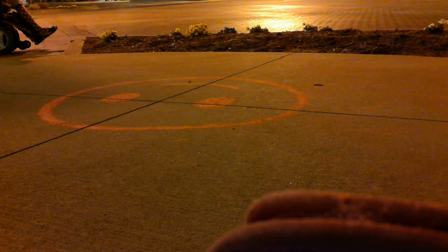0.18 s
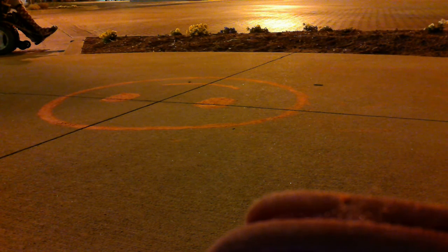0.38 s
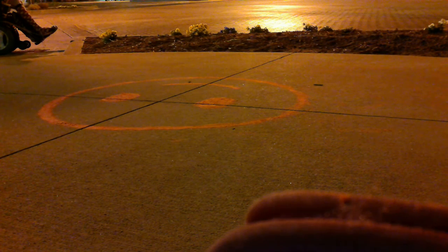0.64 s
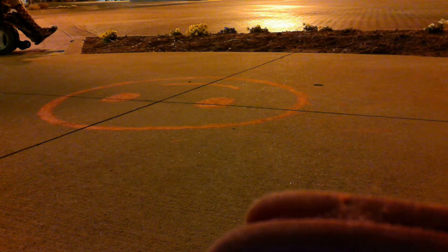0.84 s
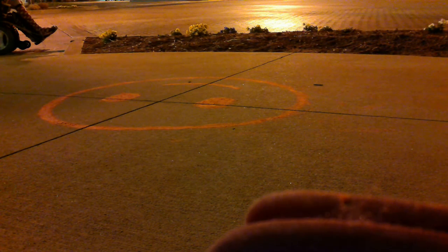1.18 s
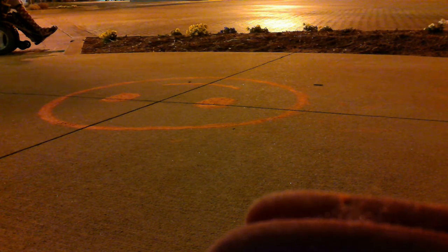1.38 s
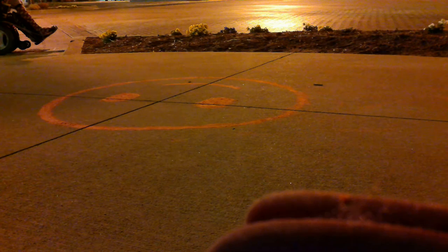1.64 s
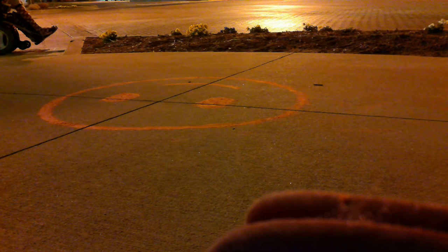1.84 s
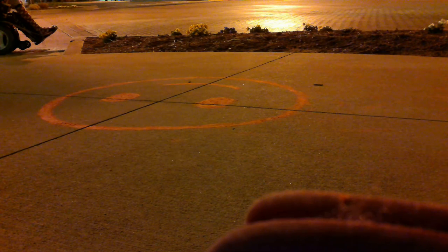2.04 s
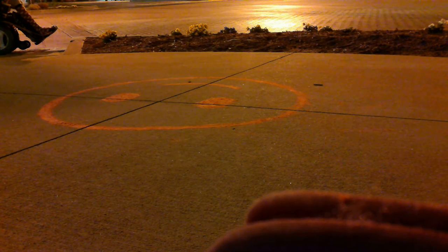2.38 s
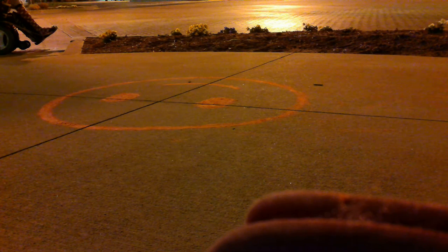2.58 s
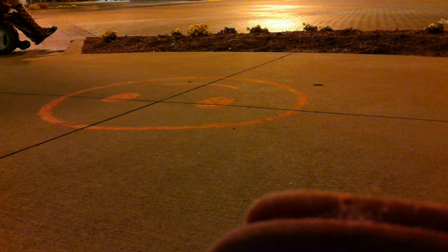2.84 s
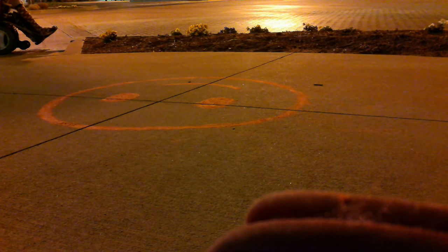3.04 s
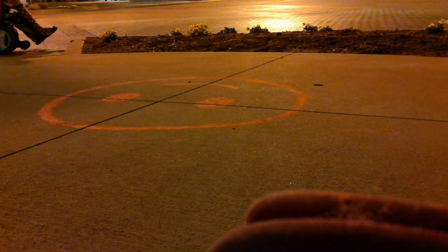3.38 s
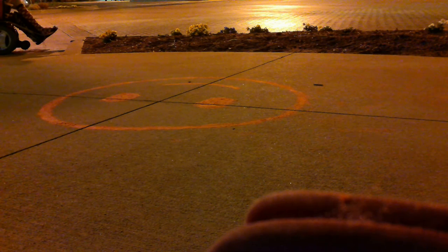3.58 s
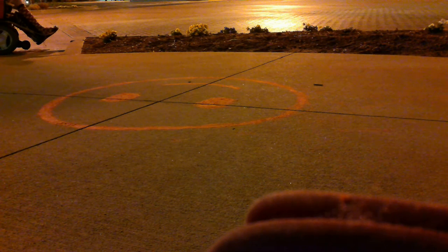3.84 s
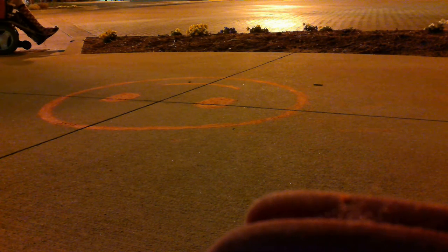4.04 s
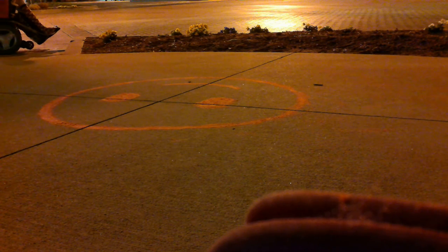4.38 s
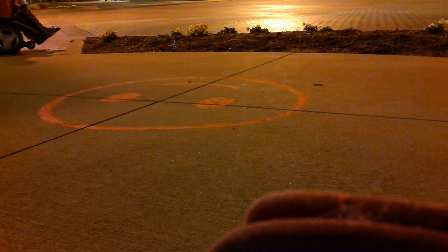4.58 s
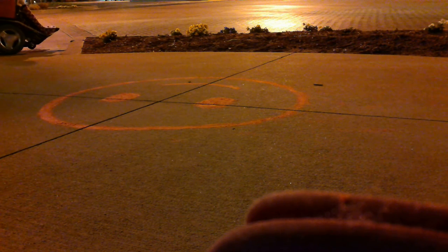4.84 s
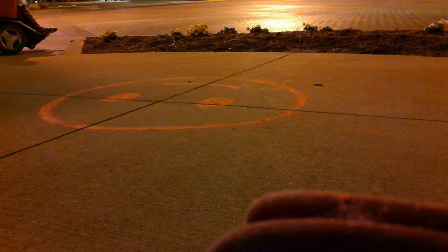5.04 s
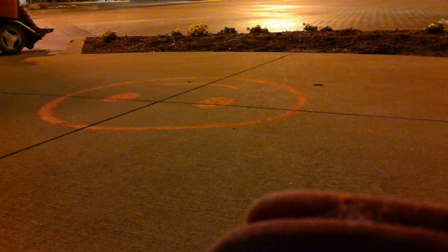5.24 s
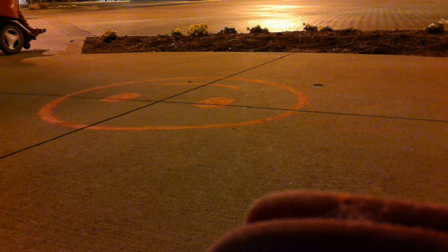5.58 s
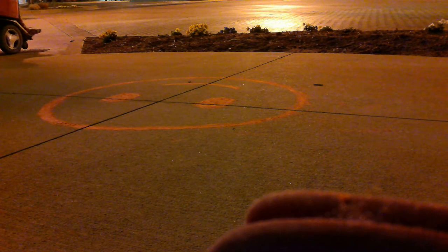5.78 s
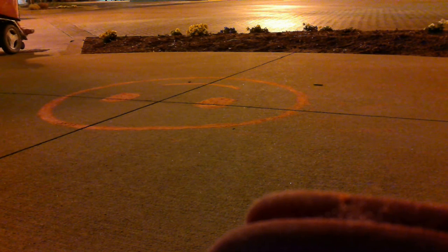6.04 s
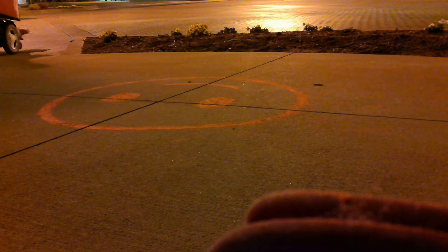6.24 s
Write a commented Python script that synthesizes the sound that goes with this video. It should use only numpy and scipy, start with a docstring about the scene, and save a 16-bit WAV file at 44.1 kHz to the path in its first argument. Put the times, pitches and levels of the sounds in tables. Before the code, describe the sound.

On a city sidewalk at night, a deep, lumpy motor hum throbs close by like a big idling engine, growing louder as a passing car's rush fades. A power wheelchair gives one sharp, rattling click, then faint squeaks and thin whines as it rolls over grit. The hum sags in pitch, then revs to its loudest near the end, with a short dry wheel knock.

```python
"""V8 engine and a wheelchair

A lumpy V8 engine idles close by at night, sags and revs; its uneven strokes boom in the housing,
with a dry whirr above. A wheelchair clicks, squeaks and rolls over grit on the pavement.
Thin whines come and go, and the rush of a passing car fades down the street."""
import sys
import numpy as np
from scipy import signal
from scipy.fft import rfft, irfft
from scipy.io import wavfile

SR = 44100
rng = np.random.default_rng(int(sys.argv[2]) if len(sys.argv) > 2 else 0)


def to_wav(sig):
    """Store sig (one row per channel, or 1-D mono) as 16-bit WAV at the path in sys.argv[1].

    Samples outside -1..1 are clipped; the rate is SR.
    """
    pcm = np.clip(np.atleast_2d(sig), -1, 1) * 32767
    pcm = np.round(pcm).astype(np.int16)
    wavfile.write(sys.argv[1], SR, pcm.T)  # frames by channels


N = 283122
T = np.arange(N) / SR
FREQ = np.maximum(np.fft.rfftfreq(N, 1 / SR), 1e-3)
IDLE_HZ, STROKES_PER_CYCLE = 50, 8  # strokes a second at idle; strokes until the pattern repeats

# How fast the engine runs. Each row: time in seconds, strokes per second.
ENGINE_SPEED = [(0, 57.01), (.5, 52.03), (1.05, 49.45), (1.5, 49.44), (1.9, 53.41), (2.15, 54.5),
                (2.75, 49.31), (3.25, 48.95), (3.55, 50.45), (4.15, 47.03), (4.7, 38.35), (4.92, 36.23),
                (5.1, 37.05), (5.3, 41.78), (5.72, 57.09), (5.95, 60.98), (6.1, 60.77), (6.42, 57.6)]
# How hard the engine works. Each row: time in seconds, effort in dB compared with a normal idle.
ENGINE_EFFORT = [(0, -9), (.55, -7.5), (1.2, -4.5), (1.7, -0.5), (2.1, 0), (2.6, 0.3), (3.2, 0.5),
                 (3.65, 1.5), (4.2, 0.5), (4.5, 0.5), (4.78, 2), (4.95, 0), (5.3, 2.1), (5.52, 2),
                 (5.65, 4.5), (5.78, 6.5), (6.1, 3.5), (6.42, 3)]
# A latch on the wheelchair snaps, rattles and stops.
# Each row: start in seconds, level in dB, lowest pitch it stirs in Hz, left minus right in dB.
LATCH_CLICKS = [(1.9285, -22, 450, -10), (1.9565, -42, 800, 5), (1.9645, -48, 700, 2),
                (1.9772, -50, 4500, 4), (1.9951, -37.5, 3700, 8)]


def undb(db):
    """Turn decibels (dB) into a number to multiply a sound by."""
    return 10 ** (np.asarray(db) / 20)


def curves(table):
    """Join the rows of a timed table with straight lines, one curve for each value column."""
    times, *columns = np.transpose(table)
    return [np.interp(T, times, column) for column in columns]


def unit(x):
    """Scale a sound so that its average power is 1."""
    return x / np.sqrt(np.mean(x ** 2))


def over_hz(points):
    """Join (Hz, value) points into a curve, giving every octave equal room."""
    hz, value = np.transpose(points)
    return np.interp(np.log(FREQ), np.log(hz), value)


def shape(x, response):
    """Filter a sound: multiply each frequency by its share of the response."""
    return irfft(rfft(x) * response, N)


def resonance(hz, width):
    """The response of a part that rings at one pitch; a narrower width rings longer."""
    return 1 / (1 + 1j * (FREQ ** 2 - hz ** 2) / (FREQ * width))


def noise(response):
    """Fresh noise, filtered by the response, with power 1."""
    return unit(shape(rng.standard_normal(N), response))


def walk(rate, count=4096):
    """Wander between -2 and 2, heading for a new random value `rate` times a second."""
    levels = 2 * np.tanh(rng.standard_normal(count))
    return np.interp(T * rate, np.arange(count), levels)


def fade(start, t60):
    """Jump to 1 at the start, then die away by 60 dB every t60 seconds."""
    return (T >= start) * np.exp(-np.log(1000) * np.maximum(T - start, 0) / t60)


def air_noise(colour):
    """Stereo noise in open air: left and right are alike in the bass, less so in the treble."""
    # Each row: frequency in Hz, how alike the two sides are (1 means the same).
    side_likeness = [(100, 1), (350, 1), (700, 0.87), (1400, 0.37), (2800, 0.1), (6000, 0.016)]
    likeness = over_hz(side_likeness)
    gain = undb(over_hz(colour))
    mid = shape(rng.standard_normal(N), gain * np.sqrt(1 + likeness))
    side = shape(rng.standard_normal(N), gain * np.sqrt(1 - likeness))
    return unit(np.array([mid + side, mid - side]))


def place(x, pan_db, lag_ms):
    """Put a sound to one side: the left gets it lag_ms later and pan_db louder (minus is softer)."""
    left = shape(x, np.exp(-2j * np.pi * FREQ * lag_ms / 1000))
    return np.array([left * undb(pan_db / 2), x * undb(-pan_db / 2)])


def street(car_db=-35, town_db=-45, nearest_s=0.045, away_s=1, flicker_db=0.96):
    """A car's tyre noise fades and dulls with distance into far traffic, under a steady fine hiss."""
    # The tone of the traffic and of the hiss. Each row: frequency in Hz, relative level in dB.
    rush_colour = [(30, 17), (150, 14.5), (350, 6.5), (600, 2), (950, 0), (1400, -5), (2200, -17.5),
                   (4000, -25), (8000, -37)]
    hiss_colour = [(100, 20.5), (4000, 0), (5500, -18), (8000, -14.5), (10500, 3.5), (12200, 4), (13800, 9),
                   (15800, 3.5)]
    # The bright sizzle of nearby tyres: centre in Hz, width in Hz, level at its nearest in dB.
    tyre_sizzle = (1840, 1200, -57.5)
    distance = np.hypot(1, (T - nearest_s) / away_s)  # 1 when the car is nearest
    loudness = np.hypot(undb(car_db) / distance, undb(town_db))
    rush = loudness * undb(flicker_db * walk(25)) * air_noise(rush_colour)
    hiss = undb([[-57.5], [-54.5]]) * air_noise(hiss_colour)  # left, right
    hz, width, db = tyre_sizzle
    sizzle = unit(shape(rng.standard_normal((2, N)), resonance(hz, width) ** 2))
    return rush + undb(db) / distance ** 4 * sizzle + hiss


def rolling(base_db=-42.5, db_per_octave=13.5, flicker_db=1.0):
    """A soft rush of wheels on concrete; its level follows the engine's speed and effort."""
    # The tone of the rush. Each row: frequency in Hz, relative level in dB.
    roll_colour = [(60, 22), (180, 22.5), (350, 16.5), (600, 6), (850, 4), (1400, -6), (2200, -9),
                   (4000, -19.5), (8000, -40)]
    rate, = curves(ENGINE_SPEED)
    effort_db, = curves(ENGINE_EFFORT)
    db = base_db + effort_db + db_per_octave * np.log2(rate / IDLE_HZ)
    return undb(db + flicker_db * walk(25)) * air_noise(roll_colour)


def grit(t60=0.012, width_share=0.26, crumble_db=-12, crumble_t60=0.09):
    """Small stones crack under the tyres, each a brief burst around its own pitch that crumbles away."""
    # Each row: start in seconds, level in dB, pitch in Hz.
    stones = [(4.316, -44, 11000), (4.337, -48, 10500), (4.359, -49, 11000), (4.403, -48, 10000),
              (4.452, -51, 9000), (4.865, -53, 8500), (5.084, -51, 7760), (5.287, -53.5, 8200)]
    hiss = rng.standard_normal(N)
    out = 0
    for start, db, hz in stones:
        loudness = undb(db) * (fade(start, t60) + undb(crumble_db) * fade(start, crumble_t60))
        out += loudness * unit(shape(hiss, resonance(hz, width_share * hz)))
    return place(out, pan_db=-2, lag_ms=0.023)


def knocks(crack_db=-5, crack_t60=0.019):
    """A wheel drops over a joint in the paving with a short dry knock."""
    # Each row: start in seconds, level in dB.
    drops = [(5.732, -36.5), (5.776, -48)]
    # The wheel's notes. Each row: pitch in Hz, relative level in dB, seconds to fade by 60 dB.
    wheel_notes = [(1420, -11, .04), (1900, -1.5, 0.022), (2830, 0.5, .018), (3480, -1, 0.02),
                   (5070, -13, .012)]
    ring = sum(undb(db) * fade(0, t60) * np.sin(2 * np.pi * hz * T) for hz, db, t60 in wheel_notes)
    crack = undb(crack_db) * fade(0, crack_t60) * noise(resonance(hz=2500, width=2600))
    out = sum(undb(db) * np.roll(ring + crack, int(start * SR)) for start, db in drops)
    return place(out, pan_db=-9.5, lag_ms=0.089)


def squeaks(gain_db=-5, half_s=0.0085, wobble_hz=65, rasp_db=-2, ping_db=-6, ping_hz=4450, ping_t60=0.07):
    """The wheelchair chirps: each brief rub sings over a soft rasp and pings one thin metal part."""
    # Each row: loudest moment in seconds, relative level in dB, pitch in Hz.
    rubs = [(1.408, -54, 4134), (3.121, -52, 4400), (3.172, -53, 3833), (3.335, -55, 4177),
            (3.445, -54, 4436), (3.494, -56, 4420), (3.814, -56, 4436), (3.934, -54, 4134),
            (4.150, -53, 4436), (4.270, -55, 4221), (4.334, -55, 3550), (4.455, -54, 4479),
            (4.516, -53, 4350), (4.718, -57, 4479), (4.786, -53, 3650), (4.871, -54, 4150),
            (4.940, -55, 3500), (5.152, -55, 3540), (5.292, -57, 4221), (5.351, -54, 3575),
            (5.519, -55, 3618), (5.947, -54, 3560), (6.071, -56, 3575)]
    wobble = np.cumsum(wobble_hz * walk(300)) / SR
    rasp = undb(rasp_db) * noise(resonance(hz=4000, width=700) ** 2)
    out = np.zeros(N)
    for peak_s, db, hz in rubs:
        near = np.abs(T - peak_s) < ping_t60
        t = T[near] - peak_s
        note = np.sqrt(2) * np.sin(2 * np.pi * (hz * t + wobble[near]))
        rub = np.exp(-(t / half_s) ** 2) * (note + rasp[near])
        ring = np.clip(1 + t / half_s, 0, 1) * np.exp(-np.log(1000) * np.maximum(t, 0) / ping_t60)
        ping = np.sqrt(2) * undb(ping_db) * ring * np.sin(2 * np.pi * (ping_hz * t + rng.random()))
        out[near] += undb(db) * (rub + ping)
    return place(undb(gain_db) * out, pan_db=-6, lag_ms=0.076)


def latch(crack_t60=0.023, echo_db=-7, echo_t60=0.19, echo_hz=1700):
    """A latch snap rings the frame and scatters off the pavement; lighter ticks stir its higher notes."""
    # The frame's notes. Each row: pitch in Hz, relative level in dB, seconds to fade by 60 dB.
    frame_notes = [(786, -14, .04), (997, -15, 0.095), (1370, -13, 0.061), (1460, -17, .08),
                   (1830, -10.5, 0.046), (2330, -24, 0.085), (2700, -10.5, 0.015), (3980, -7, 0.014),
                   (5460, -18, 0.028), (6130, -13.5, 0.017)]
    # The tone of the crack. Each row: frequency in Hz, relative level in dB.
    crack_colour = [(250, -4), (700, 0), (1400, 5), (2400, -12), (3200, -7), (4100, 0), (5200, -3),
                    (6200, -2), (7500, -11.5), (10500, -5), (14000, -9), (16000, -3)]
    length = SR // 4
    decay = lambda t60: fade(0, t60)[:length]
    ring = sum(undb(db) * decay(t60) * np.sin(2 * np.pi * (hz * T[:length] + rng.random()))
               for hz, db, t60 in frame_notes)
    crack = air_noise(crack_colour)
    cut_treble = signal.butter(2, echo_hz, fs=SR, output="sos")
    scatter = signal.sosfilt(cut_treble, rng.standard_normal((2, length)))
    scatter *= undb(echo_db) * decay(echo_t60) / np.linalg.norm(decay(echo_t60))
    out = np.zeros((2, N))
    for start, db, low_hz, pan_db in LATCH_CLICKS:
        span = slice(int(start * SR), int(start * SR) + length)
        cut_bass = signal.butter(2, low_hz, "high", fs=SR, output="sos")
        hit = signal.sosfilt(cut_bass, ring + crack[:, span] * decay(crack_t60))
        echo = signal.fftconvolve(hit, scatter, axes=1)[:, :length]
        out[:, span] += undb(db) * (undb([[pan_db / 2], [-pan_db / 2]]) * hit + echo)
    return out


def catch(slide_db=-56, judder_db=4):
    """The catch judders along between the latch's snap and its closing tick."""
    sliding = (T > LATCH_CLICKS[0][0]) & (T < LATCH_CLICKS[-1][0])
    scrape = noise(resonance(hz=6000, width=1500))
    return place(undb(slide_db + judder_db * walk(450)) * sliding * scrape, pan_db=3, lag_ms=0)


def whine(notes_hz=(424, 542), drift=0.0055, waver_db=1.3):
    """Two thin, slightly unsteady notes swell and fade."""
    # Each row: loudest moment in seconds, half length in seconds, low note in dB, high note in dB.
    swells = [(2.19, 0.14, -43, -55), (3.502, 0.2, -52, -52.5), (3.89, 0.066, -50, -47),
              (5.437, 0.17, -45, -52), (5.738, 0.23, -64, -54.5), (6.038, 0.18, -46, -44),
              (6.297, 0.17, -51, -45.5)]
    out = 0
    for k, hz in enumerate(notes_hz):
        swell = sum(undb(db[k]) * np.exp(-((T - peak_s) / half_s) ** 2) for peak_s, half_s, *db in swells)
        phase = np.cumsum(hz * (1 + drift * walk(12))) / SR
        out += np.sqrt(2) * swell * undb(waver_db * walk(25)) * np.sin(2 * np.pi * phase)
    return place(out, pan_db=-2.1, lag_ms=0.19)


def throb(phase, depth):
    """The level rises and falls once in every cycle of strokes; phase counts the strokes so far."""
    return 1 + depth * np.sin(2 * np.pi * phase / STROKES_PER_CYCLE)


def hollow_drone(hz=186.3, wander_hz=3.99, idle_db=-42.5, db_per_octave=27, waver_db=0.5, rumble_db=-3):
    """A wandering low note and its rumble throb with the engine, and fade below idle speed."""
    rate, = curves(ENGINE_SPEED)
    note = np.sqrt(2) * np.sin(2 * np.pi * np.cumsum(hz + wander_hz * walk(25)) / SR)
    rumble = undb(rumble_db) * noise(resonance(hz, width=45) ** 2)
    db = idle_db + db_per_octave * np.log2(np.minimum(rate / IDLE_HZ, 1))
    drone = undb(db) * (note * undb(waver_db * walk(21)) + rumble)
    return place(drone * throb(np.cumsum(rate) / SR, depth=0.39), pan_db=-0.8, lag_ms=0.19)


def whirr(phase, depth=0.015, flicker_db=2.0, burst_db=5, air_db=-2):
    """Dry machine noise flutters with the shaft, while moving parts chafe in light, uneven bursts."""
    # The tone of the whirr. Each row: frequency in Hz, relative level in dB.
    whirr_colour = [(500, -5), (1500, 1.5), (2800, 3.5), (3700, 1.5), (4400, 1), (4900, -3), (6200, 0),
                    (9000, -3.5), (15000, -18.5)]
    # Each row: centre in Hz, width in Hz, level in dB compared with the direct whirr.
    chafe_bands = [(3650, 210, -13.5), (4400, 170, -13)]
    flutter = (1 + depth * np.cos(2 * np.pi * phase / 4)) * undb(flicker_db * walk(40))
    direct = flutter * noise(undb(over_hz(whirr_colour)))
    for hz, width, db in chafe_bands:
        chafe = noise(resonance(hz, width) ** 2)
        direct += undb(db) * unit(chafe * undb(burst_db * walk(45)))
    return place(direct, pan_db=-2.6, lag_ms=0.08) + undb(air_db) * air_noise(whirr_colour)


def growl(phase, rate, effort_db, growth=1.32, db_per_octave=24, waver_db=1.5, wobble=0.19):
    """When the engine runs fast and works hard, rough tones beat against the hum and growl above it."""
    # One entry for each tone: vibrations per engine cycle; level in dB at idle.
    multiples = [14, 28, 30, 40, 43]
    levels_db = [-45, -55.5, -56, -55, -54.5]
    load_db = growth * effort_db + db_per_octave * np.log2(rate / IDLE_HZ)
    out = 0
    for multiple, db in zip(multiples, levels_db):
        turns = multiple / STROKES_PER_CYCLE * phase + wobble * walk(19) + rng.random()
        out += np.sqrt(2) * undb(db + waver_db * walk(27)) * np.sin(2 * np.pi * turns)
    return undb(load_db) * out


def hum(phase, rate, effort_db, waver_db=1.12):
    """The engine's clean tones each swell as the speed sweeps them over a pitch the body carries well."""
    # One entry for each tone: vibrations per engine cycle; relative level in dB.
    multiples = [8, 10, 11, 12, 14, 16, 18, 19, 24, 28, 29, 30, 38, 42]
    levels_db = [0, -4, -5, -4, -22, 2, -13, -16, -1, -5.5, -3.5, -0.5, -5.5, -4.5]
    # How well the vehicle's body carries a tone. Each row: pitch in Hz, gain in dB.
    body_gain = [(37, -42), (44, -32.5), (50, -30), (55, -38), (61, -48.5), (80, -44), (92, -34),
                 (100, -33), (109, -23), (116, -24.5), (123, -27.5), (134, -62), (150, -43), (170, -41),
                 (184, -38.5), (198, -40.5), (214, -39.5), (230, -39.5), (250, -60), (320, -38.5),
                 (345, -50)]
    # Each row: time in seconds, dB added to the lowest tone, dB added to the others.
    hum_swells = [(0, -6, 1), (.8, 2, -5), (1.25, -2.5, 0.5), (1.55, 2, -4), (1.66, 2, -12),
                  (1.82, 6.5, -2.5), (2.03, -6, -2.5), (2.38, -3, -2), (2.58, -2.5, -5), (3.1, 0.5, -1),
                  (3.7, -4.5, -2.5), (4.3, 0.5, 0), (4.55, -1, -5), (4.69, -5, -2), (4.79, -2, -9),
                  (4.9, -7, -1.5), (5.17, 0, -4), (5.3, -6, -3), (5.47, 1.5, -3), (5.62, 0, -3.5),
                  (5.85, 14, -3), (6.42, 3, -0.5)]
    body_hz, body_db = np.transpose(body_gain)
    lowest_db, upper_db = curves(hum_swells)
    out = 0
    for multiple, db in zip(multiples, levels_db):
        per_stroke = multiple / STROKES_PER_CYCLE
        carried_db = np.interp(np.log(per_stroke * rate), np.log(body_hz), body_db)
        swell_db = lowest_db if per_stroke == 1 else upper_db
        level_db = db + effort_db + carried_db + swell_db + waver_db * walk(23)
        out += np.sqrt(2) * undb(level_db) * np.sin(2 * np.pi * (per_stroke * phase + rng.random()))
    return out


def strokes(phase, scatter=0.31, rough_db=-15):
    """Uneven pushes repeat every cycle, each a little different, with some noise of swirling air."""
    # One entry for each stroke of a cycle: its strength above or below the average, as a share.
    strengths = [0.55, -0.56, -0.23, -0.24, 0.86, 0.09, 0.4, -0.52]
    starts = np.flatnonzero(np.diff(np.floor(phase)))
    pulses = np.zeros(N)
    pulses[starts] = np.resize(strengths, len(starts)) + scatter * rng.standard_normal(len(starts))
    return unit(pulses) + undb(rough_db) * rng.standard_normal(N)


def ring_body(push, notes, spread_s=0.017):
    """The pushes ring several parts; each lies further along the body, so they blur into a drone."""
    response = 0
    for k, (hz, width, db) in enumerate(notes):
        delay = np.exp(-2j * np.pi * FREQ * k * spread_s)
        response += undb(db) * resonance(hz, width) * resonance(hz, 4 * width) * delay
    return unit(shape(push, response))


def engine(boom_growth=0.92, drone_growth=0.98, whirr_growth=0.61):
    """The V8's shaft drives hum, growl, boom, drone and whirr; a growth is dB gained per dB of effort."""
    # The notes of the housing and of its panels. Each row: pitch in Hz, width in Hz, relative level in dB.
    housing_notes = [(24, 17, -5), (62.1, 11.5, 6.5), (115.8, 15.2, 7), (175.6, 8.4, -9), (222.1, 19, 0),
                     (262.7, 10.8, -6)]
    panel_notes = [(301.2, 11.8, 0.5), (328.8, 15.2, 3), (355.7, 8.5, -2.5), (432, 16.7, -3),
                   (531, 33, -11), (625.6, 14.5, -12.5)]
    rate, = curves(ENGINE_SPEED)
    effort_db, = curves(ENGINE_EFFORT)
    phase = np.cumsum(rate) / SR
    push = strokes(phase)
    tones = hum(phase, rate, effort_db) * throb(phase, depth=0.073) + growl(phase, rate, effort_db)
    boom = undb(-33.5 + boom_growth * effort_db) * ring_body(push, housing_notes)
    drone = undb(-43 + drone_growth * effort_db) * ring_body(push, panel_notes)
    drone *= throb(phase, depth=0.12) * throb(2 * phase, depth=0.18)
    return (place(tones + boom, pan_db=-0.88, lag_ms=0.15)
            + place(drone, pan_db=-2.4, lag_ms=0.25)
            + undb(-58 + whirr_growth * effort_db) * whirr(phase))


def scene():
    """A V8 engine idles, sags and revs, while a wheelchair clicks and squeaks beside the street."""
    return (engine() + hollow_drone() + rolling() + whine()
            + squeaks() + latch() + catch() + knocks() + grit() + street())


def record(dry, top_hz=15800):
    """Cut away the very highest treble."""
    return signal.sosfilt(signal.ellip(10, .2, 70, top_hz, fs=SR, output="sos"), dry)


dry = scene()
out = record(dry)
to_wav(out)
```